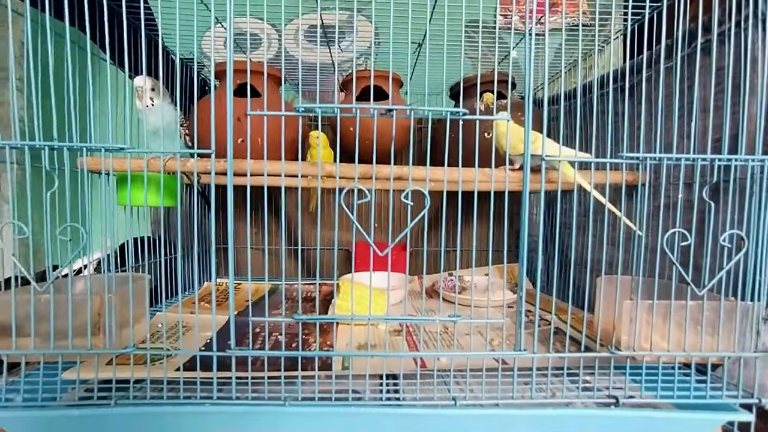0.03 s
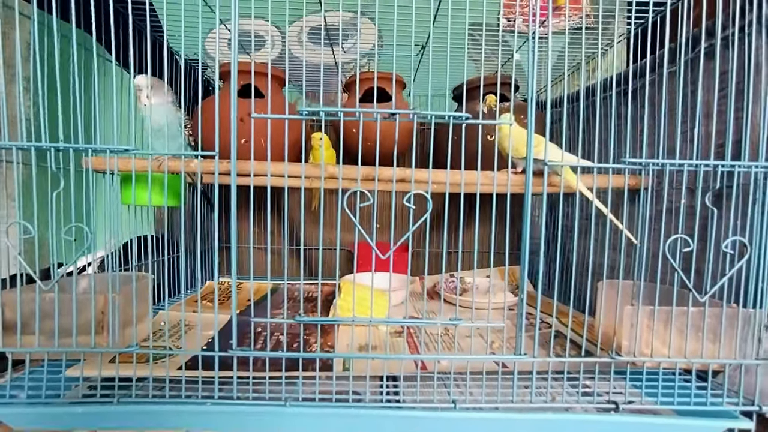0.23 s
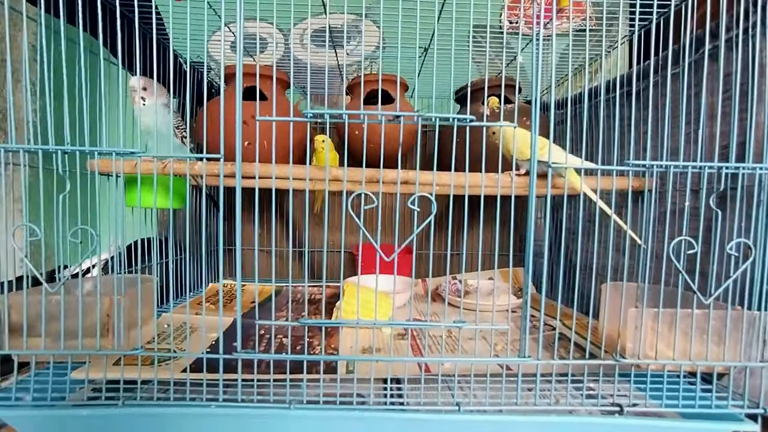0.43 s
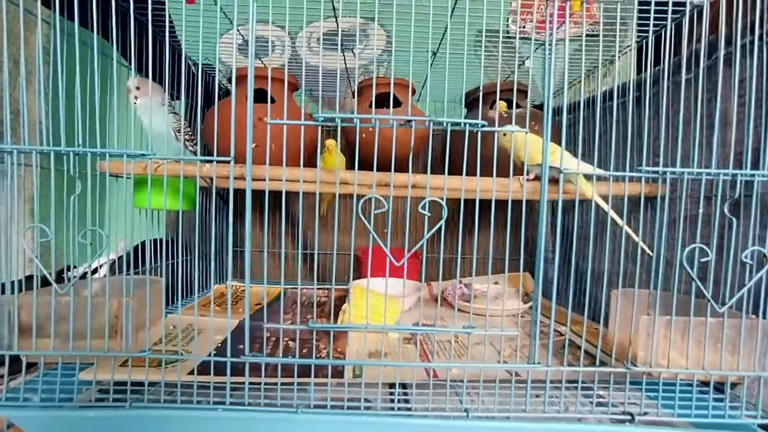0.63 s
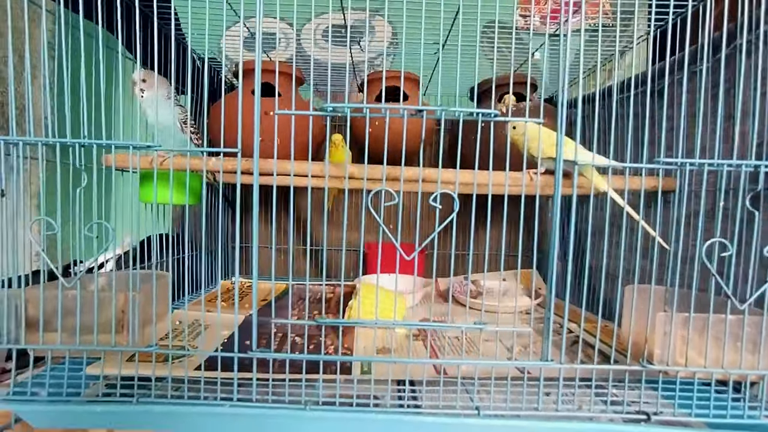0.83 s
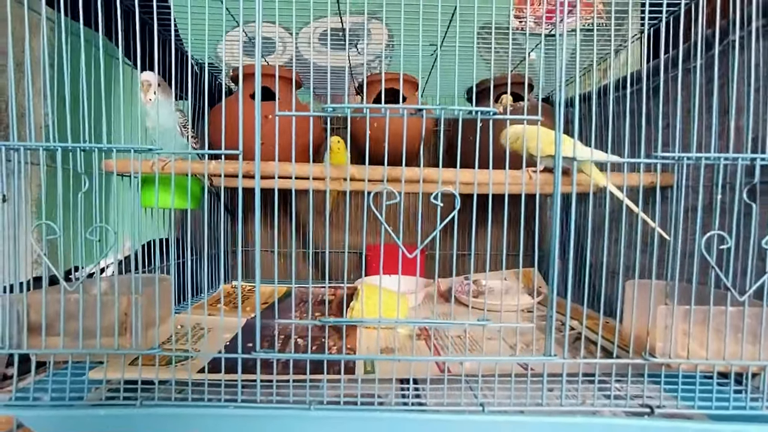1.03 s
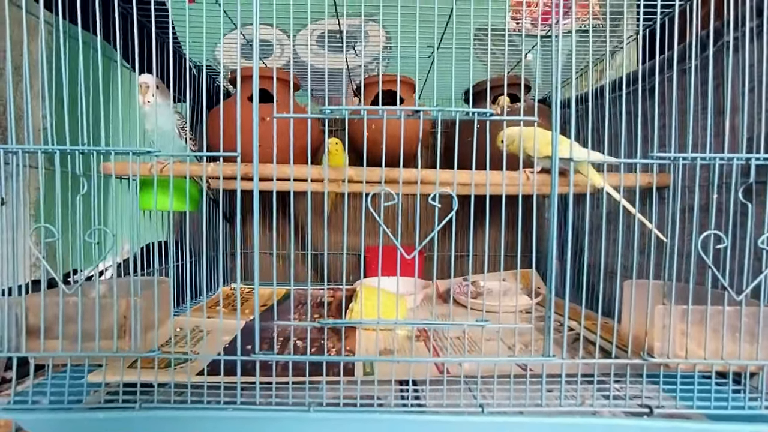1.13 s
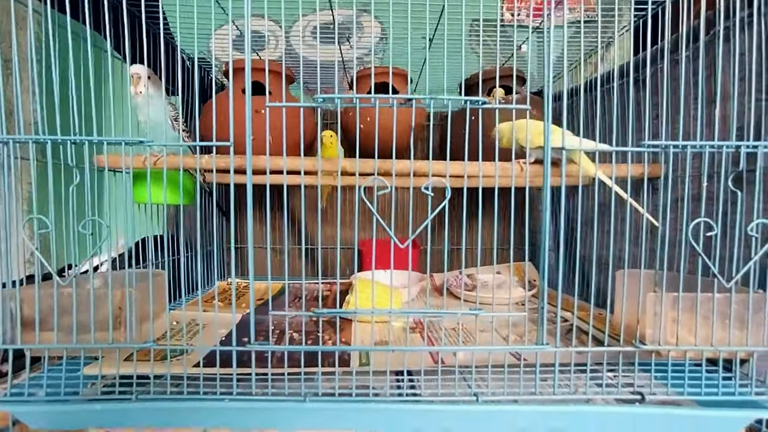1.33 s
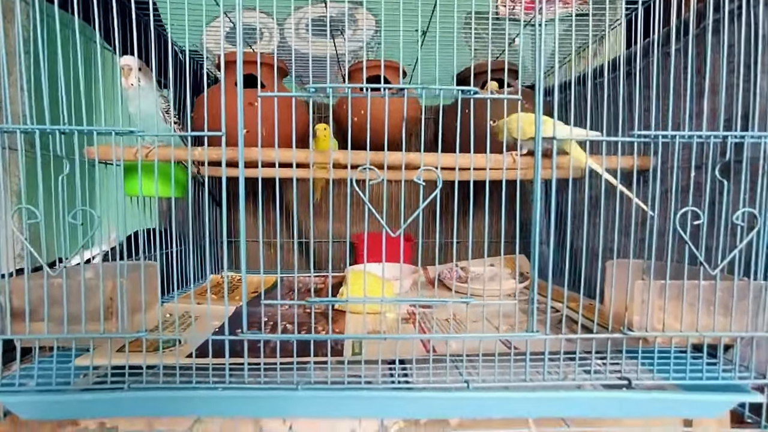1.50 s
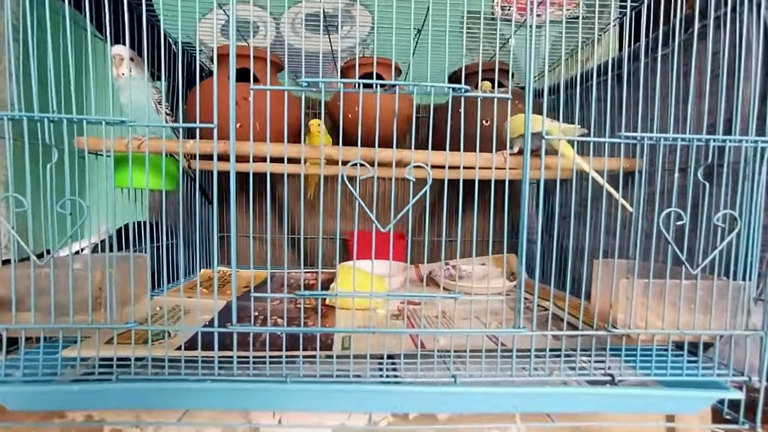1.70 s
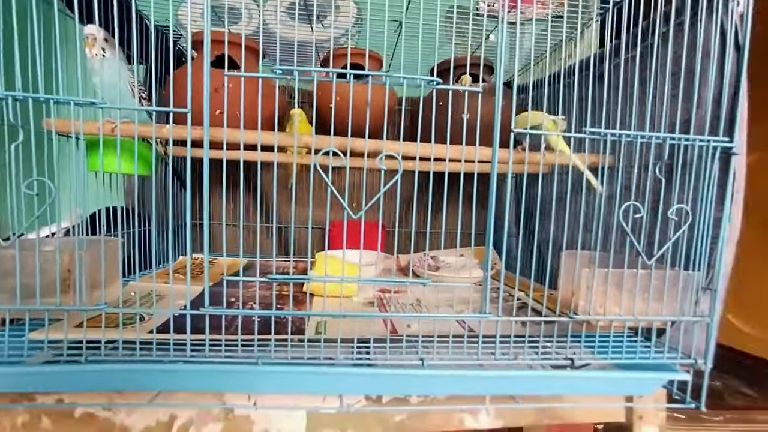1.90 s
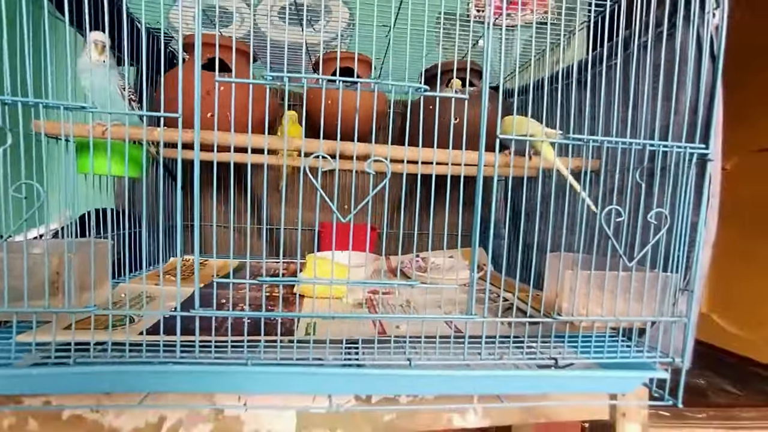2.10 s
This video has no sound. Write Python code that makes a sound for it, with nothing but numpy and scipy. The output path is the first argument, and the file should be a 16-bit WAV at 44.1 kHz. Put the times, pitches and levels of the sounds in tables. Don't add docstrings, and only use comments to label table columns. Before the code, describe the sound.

Parakeets in a cage: a burst of harsh buzzy squawks, a light knock on the perch, then a second bird's rapid sliding whistles, with faint distant twitter, in an echoing room, miked close, birds toward the left.

```python
import sys
import numpy as np
from scipy import signal
from scipy.fft import rfft, irfft, next_fast_len
from scipy.io import wavfile
from scipy.ndimage import uniform_filter1d, map_coordinates

SR = 44100
rng = np.random.default_rng(int(sys.argv[2]) if len(sys.argv) > 2 else 0)


def digitize_waveform(pressure):
    field = np.atleast_2d(pressure).T
    bounded = np.clip(field, -1, 1)
    quanta = np.round(bounded * 32767).astype(np.int16)
    wavfile.write(sys.argv[1], SR, quanta)


def invert_db(level):
    return 10 ** (np.asarray(level, dtype=float) / 20)


N = 94815

# (time [s], length [s], start pitch [Hz], end pitch [Hz], level [dB])
SQUAWKS = [
    (-.08, 0.037, 3680, 3635, -18.5),
    (0.2244, 0.038, 3728, 3510, -20.5),
    (0.31, .059, 3990, 3933, -19.5),
    (0.3669, 0.05, 3597, 4272, -17.5),
    (0.4826, 0.074, 3773, 4244, -19.5),
]
BUZZ_HZ = [198, 213, 190, 165, 190]
PARTIALS_DB = [-41, 0, 0, 0, 1.5, -40]
# (frequency [Hz], gain [dB])
BEAK = [(400, -57), (2100, 7), (3600, 0.5), (7200, 0), (9600, -11), (10600, -28), (16000, -6)]
# (time [s], length [s], start pitch [Hz], end pitch [Hz], level [dB])
SCREECHES = [
    (.37, .028, 3420, 3860, -27.5),
    (.552, 0.0086, 3400, 3640, -31),
]
# (time [s], level [dB])
FLOCKS = [(0, -46.5), (.08, -44.5), (.8, -39.5), (.95, -47.5), (1.25, -53), (1.3, -35.5), (1.45, -40.5),
          (1.56, -66), (1.6, -36.5), (1.85, -36.5), (1.93, -41), (2.03, -33.5)]
# (frequency [Hz], density [dB per Hz])
FLOCKS_COLOUR = [(600, -50), (1600, -34), (2300, -10), (3200, 0), (4800, -18), (6500, -3), (9500, -11),
                 (10800, -26)]
# (time [s], level [dB])
STREET = [(0.0, -56), (0.08, -47.5), (0.15, -51.5), (0.23, -45.5), (0.26, -56), (0.42, -60), (0.49, -51.5),
          (0.57, -56), (0.69, -47.5), (1.2, -54.5), (1.26, -62.5), (1.35, -47), (1.42, -65), (1.6, -48.5),
          (1.66, -66), (1.81, -49.5), (2.01, -58), (2.15, -42.5)]
# (frequency [Hz], density [dB per Hz])
STREET_COLOUR = [(25, -43), (92, 1), (160, -14.5), (216, -9), (400, -20.5), (700, -13.5), (1000, -20.5),
                 (2500, -38)]
# (frequency [Hz], correlation [1])
LIKENESS = [(60, .97), (300, .82), (1200, 0)]
# (time [s], pitch [Hz], level [dB])
FAR_CALLS = [
    [(.08, 3167, -43), (.1, 3300, -42.5), (.125, 3376, -44.5), (.15, 2990, -39.5), (.17, 3373, -47.5),
     (.2, 3097, -46.5), (.222, 2920, -41)],
    [(.622, 2906, -38), (.645, 3150, -49), (.66, 3525, -47), (.668, 2786, -43), (.685, 2690, -44),
     (.7, 3447, -54.5), (.73, 3094, -48.5), (.76, 2768, -45), (.795, 2727, -48)],
    [(1.697, 2670, -49), (1.712, 2820, -47.5), (1.724, 3206, -45.5), (1.729, 2914, -48),
     (1.748, 2980, -49.5), (1.768, 3520, -47.5), (1.778, 3037, -47.5), (1.79, 2860, -49),
     (1.804, 2820, -55)],
    [(1.806, 3587, -43), (1.82, 3400, -48), (1.835, 2640, -51), (1.848, 2500, -51)],
    [(2.003, 3710, -37), (2.03, 3155, -48.5), (2.06, 3693, -47), (2.072, 2780, -49), (2.11, 2760, -43.5),
     (2.127, 3180, -44.5), (2.15, 2905, -48)],
]
FAR_OCTAVE_DB = [-5, 7, 15, 14.5, 3.5]
# (time [s], length [s], start pitch [Hz], end pitch [Hz], level [dB])
TWITTER = [
    (1.2, .039, 6100, 6170, -47),
    (1.64, 0.023, 7300, 4600, -36),
    (1.682, 0.0179, 7500, 6800, -33),
    (1.828, 0.043, 2750, 1300, -46),
    (1.6, 0.0084, 8440, 8400, -31.5),
    (1.1, 0.018, 8800, 8800, -44.5),
]
# (time [s], peak level [dB], resonance [Hz], t60 [s])
KNOCKS = [
    (.229, -17, 1390, 0.025),
    (0.799, -14.5, 2230, 0.18),
    (1.347, -27, 925, 0.033),
    (1.701, -32, 1410, 0.17),
    (2.138, -24, 269, 0.14),
]
# (time [s], length [s], start pitch [Hz], end pitch [Hz], level [dB])
HOOTS = [
    (.84, 0.334, 374.2, 375.3, -52.5),
    (1.72, 0.154, 199, 219.4, -49),
    (1.98, 0.36, 692, 722, -54.5),
]
# (time [s], pitch [Hz], level [dB])
PHRASE_1 = [
    [(.893, 4700, -44), (.9, 5230, -32.5), (.903, 5680, -33.5), (.906, 4900, -31), (.915, 4900, -33.5),
     (.922, 4880, -45)],
    [(.93, 2040, -41), (.94, 2295, -30), (.957, 2410, -33.5), (.96, 3735, -28), (.972, 4440, -26.5),
     (.98, 3260, -26), (.989, 2460, -32.5)],
    [(0.995, 4580, -29), (1.001, 4450, -24.5), (1.013, 3580, -19), (1.021, 3566, -27), (1.027, 3294, -25),
     (1.033, 3136, -27), (1.041, 3090, -33), (1.049, 3230, -30.5), (1.06, 3132, -24)],
]
PHRASE_2 = [
    [(1.113, 5410, -48), (1.12, 4980, -30.5), (1.135, 4800, -38), (1.139, 4040, -23), (1.143, 2280, -38)],
    [(1.168, 3946, -42.5), (1.186, 3427, -33.5), (1.192, 3324, -42), (1.196, 2740, -28), (1.2, 2516, -36),
     (1.21, 1826, -35.5)],
    [(1.209, 3330, -35.5), (1.213, 3313, -23.5), (1.219, 3234, -29.5), (1.225, 2939, -28.5),
     (1.249, 2621, -26), (1.257, 2434, -39), (1.265, 2310, -24.5), (1.283, 2376, -29.5), (1.29, 2290, -46)],
]
PHRASE_3 = [
    [(1.358, 5940, -37), (1.366, 4940, -25), (1.378, 4470, -32.5), (1.384, 4660, -35.5), (1.387, 3720, -28),
     (1.392, 3384, -26), (1.4, 3790, -33.5), (1.406, 4250, -23)],
    [(1.408, 2610, -20), (1.416, 2790, -37), (1.419, 3314, -43), (1.43, 3113, -25)],
]
PHRASE_4 = [
    [(1.6, 4600, -29), (1.606, 4160, -23), (1.614, 4650, -34), (1.627, 5400, -31.5), (1.633, 5450, -32),
     (1.637, 4320, -24), (1.645, 3910, -28), (1.655, 3580, -31.5), (1.672, 3330, -42)],
]
PHRASE_5 = [
    [(1.848, 4650, -32), (1.852, 2950, -36), (1.857, 2336, -36), (1.875, 2200, -30), (1.884, 2250, -28),
     (1.887, 3833, -38), (1.899, 3500, -25), (1.908, 3260, -27), (1.914, 2400, -33.5)],
    [(1.93, 4645, -36), (1.938, 4040, -23), (1.948, 3700, -27), (1.956, 3380, -24), (1.964, 2880, -28),
     (1.972, 2780, -24), (1.983, 2700, -29), (1.998, 2214, -37.5)],
]
# (time [s], length [s], start pitch [Hz], end pitch [Hz], level [dB])
ASIDES = [(.927, 0.018, 3840, 4400, -36), (1.142, .012, 3640, 4300, -47.5), (1.15, 0.04, 2062, 2600, -35.5),
          (1.2, 0.0065, 3830, 3570, -34.5), (1.31, 0.036, 2354, 2336, -38), (1.398, 0.015, 1993, 1880, -40),
          (1.432, 0.043, 1906, 2000, -39.5), (1.463, 0.03, 2692, 2076, -33),
          (1.494, 0.023, 1390, 1665, -41), (1.652, 0.011, 3220, 1760, -44),
          (1.671, 0.034, 2082, 1932, -40.5), (1.715, 0.025, 2060, 1984, -45),
          (1.752, 0.023, 2050, 2196, -41), (1.73, 0.034, 1453, 1317, -47.5),
          (1.912, 0.014, 3270, 3500, -46)]
# (frequency [Hz], t60 [s])
ROOM = [(3000, 0.51), (7000, 0.28), (14000, 0.045)]
# (frequency [Hz], gain [dB])
SHADE = [(5000, 1.5), (8000, -0.5), (12000, -4)]

SWELL_S, STOP_S = 0.023, 0.0083
BUZZ_JITTER, BUZZ_SCATTER_DB, HOARSE, LEAK = .02, 1.5, .25, .05
SWEEP, BURST, PITCH_SCATTER = .36, .26, .07
OCTAVE_DB, THIRD_DB = -30, -18
FLUTTER_DB, NEAR_WAVER = 3.6, .012
FAR_ROUGH_DB, FAR_WAVER = 5.5, .035
FIRST_WALL_S, WALL_SPREAD, WALL_DB, WALL_LOSS_DB = .0011, 1.9, -8.5, -0.5
NEAR_WET_DB, DISTANT_WET_DB = -8, -8
LEFT_DB, RIGHT_DB, RIGHT_LAG = 6, 0, 11
PATCHY_DB, KNEE = 4.5, 6
DUCK_DB, DUCK_KNEE, DUCK_S = -4, 0.044, 0.066


def unit(x):
    return x / np.sqrt(np.mean(x ** 2) + 1e-20)


def along(points, hz):
    f, v = np.transpose(points)
    return np.interp(np.log(hz + 1), np.log(f + 1), v)


def wobble(rate, size):
    knots = rng.standard_normal(int(size * rate / SR) + 4)
    return map_coordinates(knots, [np.arange(size) * rate / SR])


def add(track, s, sound):
    start = round((s + 1) * SR)
    track[start:][:len(sound)] += sound[:len(track) - start]


def coloured(x, gain):
    m = next_fast_len(x.shape[-1] + 8192)
    return irfft(rfft(x, m) * gain(np.fft.rfftfreq(m, 1 / SR)), m)[..., :x.shape[-1]]


def whistle(t, hz, db, edge_s, rough_db, waver, octave_db):
    phase = 2 * np.pi * np.cumsum(hz * (1 + waver * wobble(204.7, size=SR)[:len(t)])) / SR
    edges = np.clip(np.minimum(t, t[-1] - t) / edge_s, 0, 1)
    flutter_db = rough_db * np.minimum(wobble(271, size=SR)[:len(t)], 1)
    overtones = invert_db(octave_db) * (np.sin(2 * phase) + invert_db(THIRD_DB) * np.sin(3 * phase))
    return np.sqrt(2) * edges * invert_db(db + flutter_db) * (np.sin(phase) + overtones)


def sung(notes, octaves_db, edge_s, rough_db, waver):
    track = np.zeros(N + SR)
    for note, octave_db in zip(notes, octaves_db):
        s, hz, db = np.transpose(note)
        t = np.arange(round((s[-1] - s[0]) * SR)) / SR
        pitch, level = np.interp(t + s[0], s, hz), np.interp(t + s[0], s, db)
        add(track, s[0], whistle(t, pitch, level, edge_s, rough_db, waver, octave_db))
    return track


def glides(rows, edge_s, rough_db, waver, octave_db):
    notes = [[(s, from_hz, db), (s + length, to_hz, db)] for s, length, from_hz, to_hz, db in rows]
    return sung(notes, [octave_db] * len(rows), edge_s, rough_db, waver)


def squawks():
    track = np.zeros(N + SR)
    for (s, length, from_hz, to_hz, db), buzz_hz in zip(SQUAWKS, BUZZ_HZ):
        t = np.arange(round(length * SR)) / SR
        cycle = np.cumsum(buzz_hz * (1 + BUZZ_JITTER * wobble(90, size=SR)[:len(t)])) / SR
        u = cycle % 1
        pitch_chance, level_chance = rng.standard_normal((2, 40))[:, cycle.astype(int)]
        hz = from_hz + (to_hz - from_hz) * t / length
        hz = hz * (1 + SWEEP * (u - BURST) + PITCH_SCATTER * pitch_chance)
        phase = np.pi * np.cumsum(hz) / SR
        tone = unit(sum(invert_db(level) * np.sin((k + 1) * phase + k * k) for k, level in enumerate(PARTIALS_DB)))
        pulse = (u / BURST * np.exp(1 - u / BURST)) ** 2
        gate = (LEAK + pulse) * invert_db(BUZZ_SCATTER_DB * level_chance)
        voice = unit(gate * (tone + HOARSE * rng.standard_normal(SR)[:len(t)]))
        envelope = np.clip(np.minimum(0.11 + t / SWELL_S, (length - t) / STOP_S), 0, 1)
        add(track, s, invert_db(db) * voice * envelope)
    track = track + glides(SCREECHES, 0.0025, FAR_ROUGH_DB, FAR_WAVER, 5.5)
    return coloured(track, lambda hz: invert_db(along(BEAK, hz)))


def rush(strength, spectrum, patchy_db, lumps_db):
    z = signal.stft(rng.standard_normal((2, N)), nperseg=512)[2]
    field = uniform_filter1d(rng.standard_normal(z.shape[1:]), size=6, axis=0)
    field = uniform_filter1d(field, size=12, axis=1)
    pair = signal.istft(z * invert_db(patchy_db * unit(field)), nperseg=512)[1][:, :N]

    def mid_side_gain(hz):
        angle = np.arccos(np.clip(along(LIKENESS, hz), -1, 1)) / 2
        return invert_db(along(spectrum, hz)) * [np.cos(angle), np.sin(angle)]

    mid, side = coloured(pair, mid_side_gain)
    db = np.interp(np.arange(N) / SR, *np.transpose(strength)) + lumps_db * wobble(13.73, size=N)
    return invert_db(db) * unit(np.array([mid + side, mid - side]))


def twitter():
    calls = sung(FAR_CALLS, FAR_OCTAVE_DB, 0.0033, FAR_ROUGH_DB, FAR_WAVER)
    return calls + glides(TWITTER, 0.0011, FAR_ROUGH_DB, FAR_WAVER, OCTAVE_DB)


def knocks():
    track, t = np.zeros(N + SR), np.arange(SR // 4) / SR
    for s, db, hz, t60 in KNOCKS:
        blow = coloured(rng.standard_normal(len(t)), lambda f: 1 / (1 + (np.log((f + 1) / hz) / 0.64) ** 4))
        add(track, s, invert_db(db - 18.5 - 60 * t / t60) * unit(blow))
    return track


def hoots():
    return glides(HOOTS, 0.024, FLUTTER_DB, 0.025, OCTAVE_DB)[SR:]


def warble():
    notes = PHRASE_1 + PHRASE_2 + PHRASE_3 + PHRASE_4 + PHRASE_5
    phrases = sung(notes, [OCTAVE_DB] * len(notes), .001, FLUTTER_DB, NEAR_WAVER)
    return phrases + glides(ASIDES, 0.0014, FAR_ROUGH_DB, FAR_WAVER, OCTAVE_DB)


def placed(x, wet_db, left_db, right_db, size):
    hz, t, z = signal.stft(rng.standard_normal((2, SR // 2)), SR, nperseg=256)
    tail = signal.istft(z * invert_db(-60 * t / along(ROOM, hz)[:, None]), SR, nperseg=256)[1]
    answer = np.pad(invert_db(wet_db) * tail / np.linalg.norm(tail[0]), ((0, 0), (300, 0)))
    answer[0, 0], answer[1, size] = invert_db(left_db), invert_db(right_db)
    for k in range(5):
        s, db = FIRST_WALL_S * WALL_SPREAD ** k, WALL_DB - WALL_LOSS_DB * k
        arrivals = [round(s * SR), round(s * SR * 1.2) + size]
        answer[[0, 1], arrivals] += invert_db(db) * rng.choice([-1, 1], size=2)
    return signal.fftconvolve(x[None], answer, axes=1)[:, SR:SR + N]


def ducked(background, calls):
    power = uniform_filter1d(np.mean(calls ** 2, axis=0), size=round(DUCK_S * SR))
    loud = np.sqrt(abs(power))
    return background * invert_db(DUCK_DB * loud / (loud + DUCK_KNEE))


def scene():
    scold = placed(squawks(), -4.5, 5.05, -1.1, size=RIGHT_LAG)
    flocks = rush(FLOCKS, FLOCKS_COLOUR, PATCHY_DB, 2.4)
    street = rush(STREET, STREET_COLOUR, PATCHY_DB, 1.2)
    far = placed(twitter(), DISTANT_WET_DB, 0, -0.86, size=3)
    near = placed(knocks() + warble(), NEAR_WET_DB, LEFT_DB, RIGHT_DB, size=RIGHT_LAG)
    return near + scold + far + hoots() + ducked(flocks + street, near + scold)


def low_pass(x):
    return signal.sosfilt(signal.butter(12, 15680, fs=SR, output="sos"), x)


def record(dry):
    left = coloured(dry[0], lambda hz: invert_db(along(SHADE, hz)))
    both = np.array([left, dry[1]])
    mix = both / (1 + abs(both) ** KNEE) ** (1 / KNEE)
    return low_pass(mix)


dry = scene()
out = record(dry)
digitize_waveform(out)
```